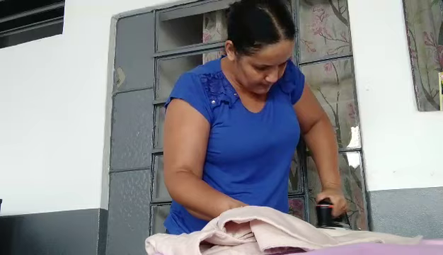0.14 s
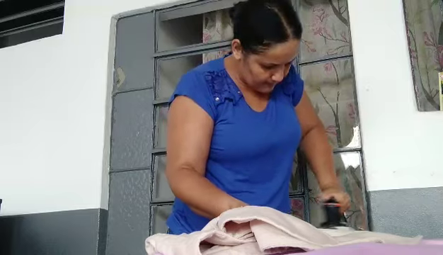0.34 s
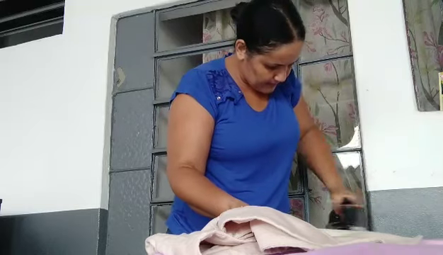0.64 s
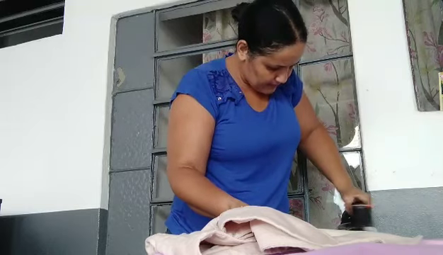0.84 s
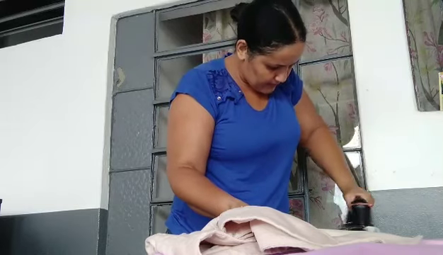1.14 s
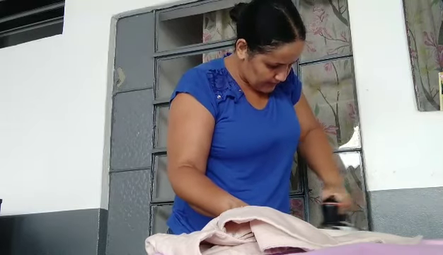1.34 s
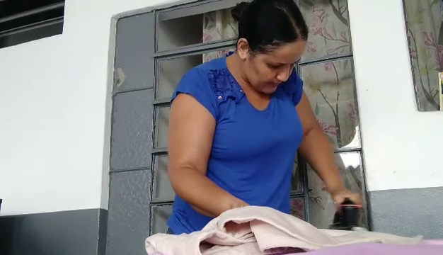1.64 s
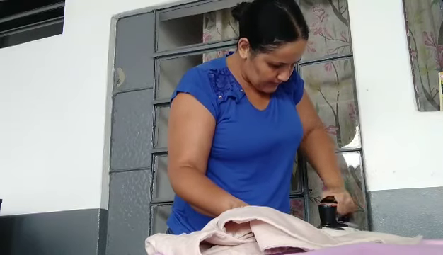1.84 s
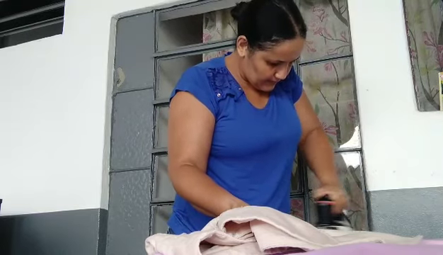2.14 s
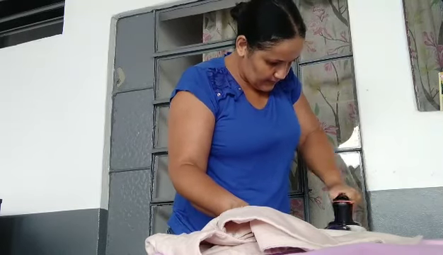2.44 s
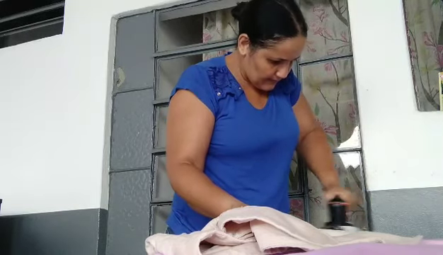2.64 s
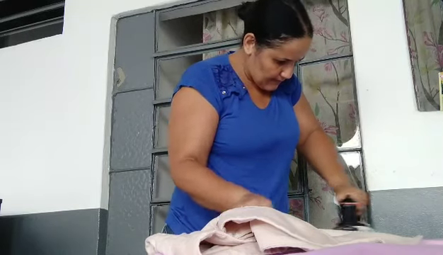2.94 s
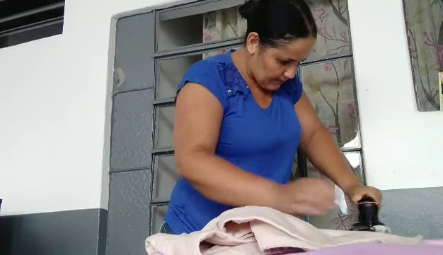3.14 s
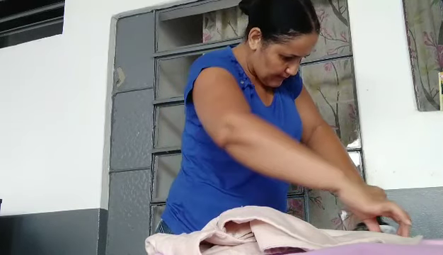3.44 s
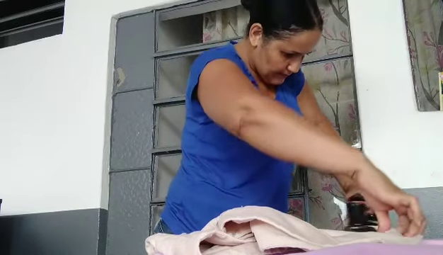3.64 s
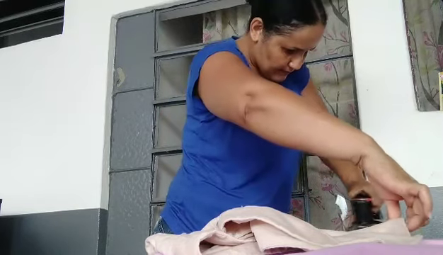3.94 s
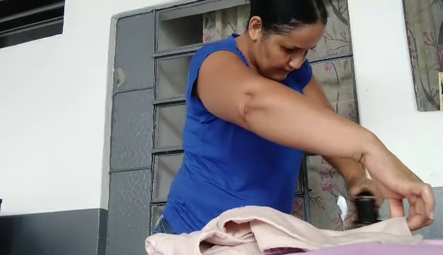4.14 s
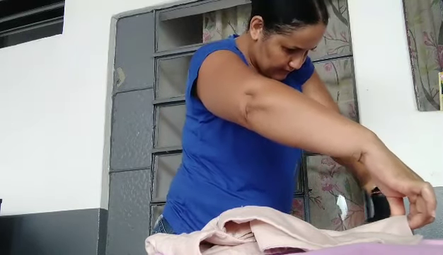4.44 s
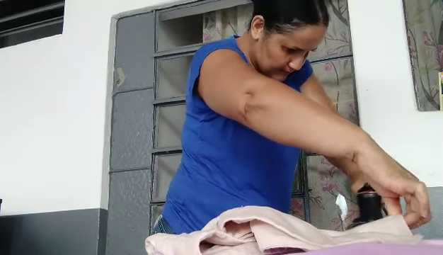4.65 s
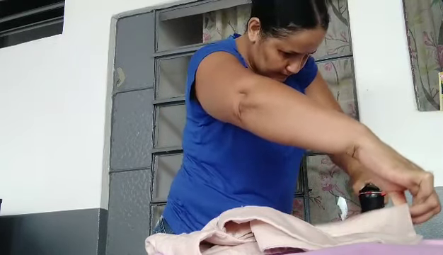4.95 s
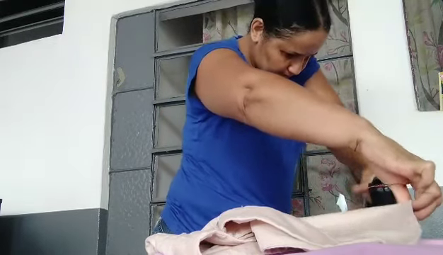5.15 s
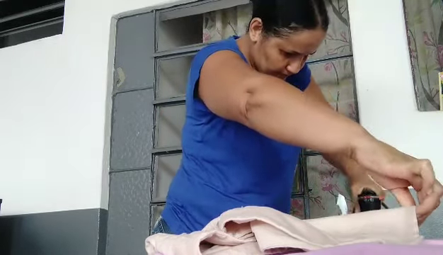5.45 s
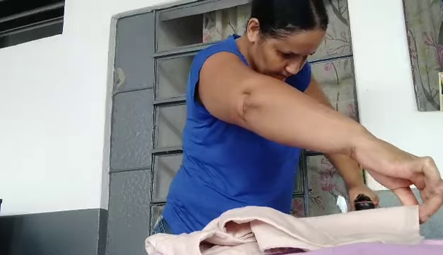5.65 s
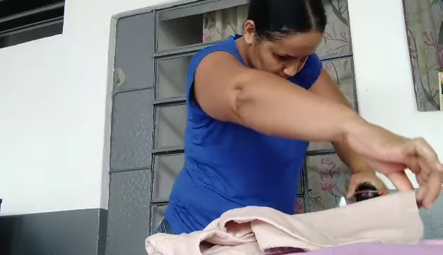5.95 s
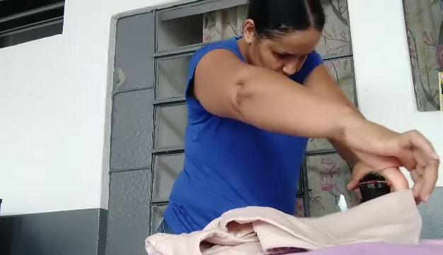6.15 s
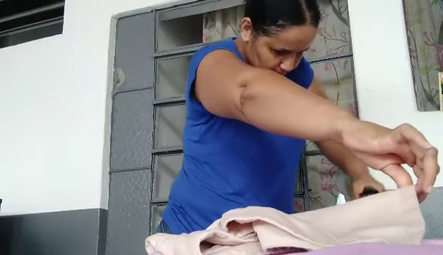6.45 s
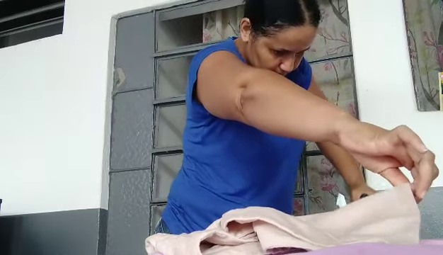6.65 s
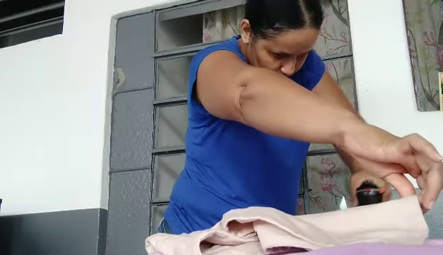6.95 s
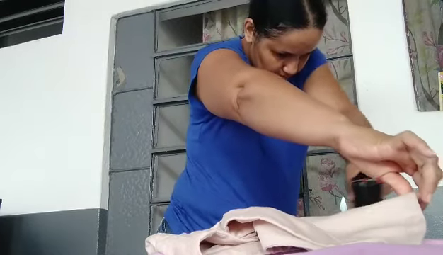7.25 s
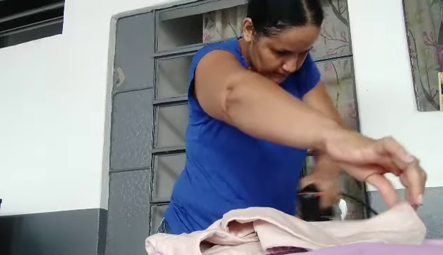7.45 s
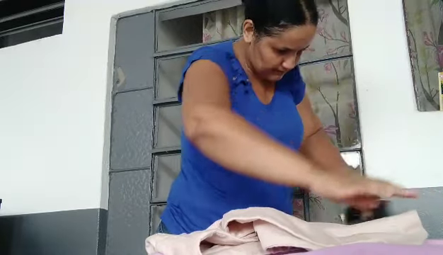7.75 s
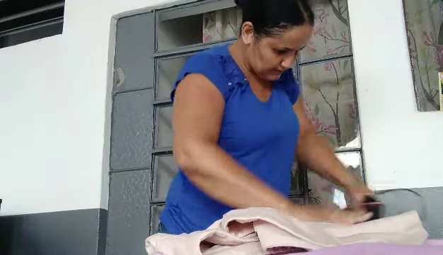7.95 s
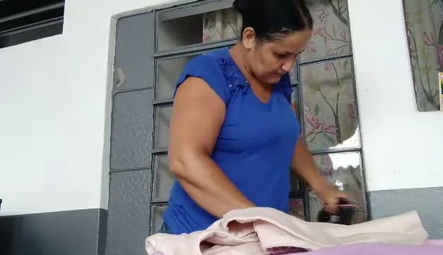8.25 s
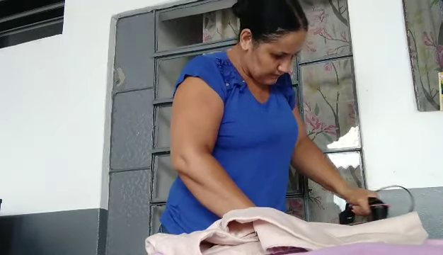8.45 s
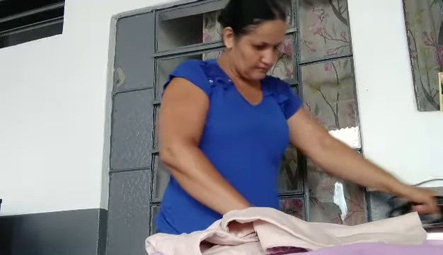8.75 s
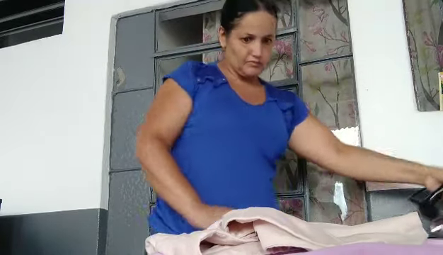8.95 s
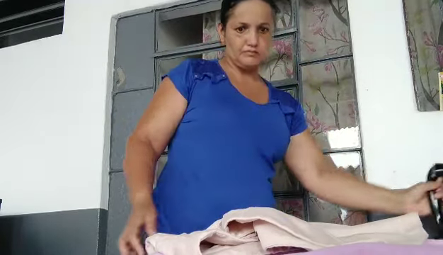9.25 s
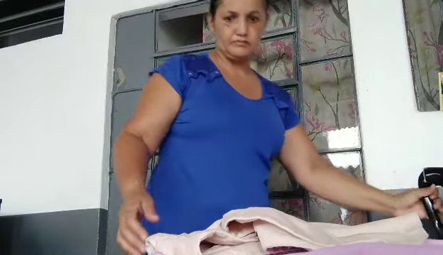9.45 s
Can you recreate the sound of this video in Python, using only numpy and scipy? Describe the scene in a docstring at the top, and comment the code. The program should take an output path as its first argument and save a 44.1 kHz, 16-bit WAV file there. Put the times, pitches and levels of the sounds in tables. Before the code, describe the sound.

A steam iron works near the microphone while muffled vehicles pass beyond the walls. Patchy soft rubbing mixes with plopping, ringing bubbles, tiny metallic ticks and sudden wet spits. The strongest knock is a low board bump before three seconds, followed by denser spitting around four. After a calmer stretch, steam blasts briefly with a high whistle, and a light heel thud ends the short-reverberant scene.

```python
"""Clothes are pressed with a steam iron on a padded board: noise bands and wavering tones make the traffic
beyond the walls and a steady hum throughout. From the start water simmers as ringing bubbles in the vents
and the soleplate rubs the cloth in noise; from 1 s drops spit, as bursts of coloured noise that die away.
The board is bumped at 2.8 s, in damped modes; at 8.3 s a jet of steam blows, noise with a whistle,
and at 9.3 s the iron is stood on its heel, with a thud and a ring."""
import sys
import numpy as np
from scipy import signal
from scipy.fft import rfft, irfft
from scipy.io import wavfile

SR = 44100
rng = np.random.default_rng(int(sys.argv[2]) if len(sys.argv) > 2 else 0)


def master_out(mix):
    """Clip the mix to full scale and print it as 16-bit PCM to the path in sys.argv[1]."""
    frames = np.transpose(np.atleast_2d(mix))
    ceiling = np.clip(frames, -1, 1)
    pcm = np.round(ceiling * 32767).astype(np.int16)
    wavfile.write(sys.argv[1], SR, pcm)


N = 423051
TIME, BINS = np.arange(N) / SR, np.fft.rfftfreq(N, 1 / SR)

# correlation of the two ears for the background: f/Hz, correlation
STREET_CORRELATION = [(30, .93), (75, 0.97), (140, 0.88), (280, 0.88), (500, 0.51), (800, 0.18),
                      (1300, -0.16), (2500, -0.064), (15000, -0.072)]
# correlation of the two ears for steam and cloth: f/Hz, correlation
STEAM_CORRELATION = [(200, 0.83), (400, 1), (700, 0.1), (1350, -.33), (2500, -0), (6000, 0)]


def amp(db):
    """Level to amplitude ratio: 20 dB is a factor of ten."""
    return 10 ** (np.asarray(db) / 20)


def unit(x):
    """Normalisation to a root-mean-square value of 1."""
    return x / np.sqrt(np.mean(x ** 2) + 1e-30)


def read(points, hz):
    """Linear interpolation of a table along a log-frequency axis."""
    f, value = np.transpose(points)
    return np.interp(np.log(hz + 1), np.log(f + 1), value)


def level(s, db):
    """An amplitude envelope linear in dB between points, silent outside them."""
    return amp(np.interp(TIME, s, db)) * (TIME >= s[0]) * (TIME <= s[-1])


def add(mix, s, sound):
    """Superposition: a sound is summed into the mix from a given moment."""
    part = mix[..., round(s * SR):][..., :sound.shape[-1]]
    part += sound[..., :part.shape[-1]]


def noise(gain, correlation):
    """Filtered noise of rms 1, its channels correlated by sharing part of one random spectrum."""
    first, other = rfft(rng.standard_normal((2, N)))
    shared = np.clip(read(correlation, BINS), -1, 1)
    second = shared * first + np.sqrt(1 - shared ** 2) * other
    return unit(irfft(np.array([first, second]) * gain, N))


def coloured(spectrum, correlation):
    """Noise whose spectral density follows a table in dB."""
    return noise(amp(read(spectrum, BINS)), correlation)


def drift(rate_hz):
    """A random modulation of rms 1: noise through a Gaussian low-pass."""
    lowpass = np.exp(-(BINS / rate_hz) ** 2)
    return unit(irfft(rfft(rng.standard_normal(N)) * lowpass, N))


def resonances(modes):
    """The summed gain of peaks, each at half its amplitude one width from its centre."""
    return sum(amp(db) / (1 + ((BINS - hz) / width) ** 2) for hz, width, db in modes)


def tone(hz, waver):
    """A sine of rms 1: phase is the integral of frequency, wandering by waver radians rms."""
    cycles = np.cumsum(hz * np.ones(N)) / SR + rng.random()
    return np.sqrt(2) * np.sin(2 * np.pi * cycles + waver * drift(9.2))


def fuzzy(phase, width_hz):
    """Narrow-band noise: a carrier modulated in quadrature by two random drifts, apart for each ear."""
    ears = [drift(width_hz) * np.cos(phase) + drift(width_hz) * np.sin(phase) for ear in range(2)]
    return unit(np.array(ears))


def swells(rows):
    """The power of bell-shaped swells, summed as for incoherent sources."""
    return sum(amp(db) ** 2 * np.exp(-((TIME - s) / half) ** 2) for s, half, db in rows)


def still_air():
    """Broadband noise of constant power stands for the still air."""
    # colour: f/Hz, relative density/dB
    air_colour = [(100, 0), (1500, -7), (2600, 4.5), (4000, 0), (5200, -3.5), (9000, -4.5), (11500, -7.5),
                  (15500, -8.5)]
    return amp(-88) * coloured(air_colour, STREET_CORRELATION)


def deep_rumble():
    """Low-frequency noise, its surges adding in power to a constant floor."""
    # colour: f/Hz, relative density/dB
    rumble_colour = [(5, -14), (18, 1.5), (27, 4.5), (35, 13), (46, -8), (60, -21.5), (150, -75)]
    # swells: middle t/s, half-length/s, relative peak level/dB
    surges = [(2.3, .4, -45.5), (3.57, .22, -42), (6.75, 0.063, -42), (9.3, .04, -50)]
    floor_db = -52
    envelope = np.sqrt(amp(floor_db) ** 2 + swells(surges))
    return envelope * coloured(rumble_colour, STREET_CORRELATION) * amp(1.2 * drift(6))


def traffic():
    """Street noise in bands: a drone, tyre rush tied to its level, and roars peaking as vehicles pass."""
    # loudness of the street: t/s, relative level/dB
    loudness = [(0, -51), (.3, -50), (.85, -45), (1.35, -46), (2, -46.5), (2.6, -49.5), (3, -45.5),
                (3.4, -49), (4.4, -51.5), (5.6, -48), (6.2, -45), (6.8, -43.5), (7.3, -46), (7.8, -44),
                (8.5, -48.5), (9.1, -51.5), (9.59, -52)]
    # colours of drone, rush and passing vehicle: f/Hz, relative density/dB
    drone_colour, rush_colour, roar_colour = [(35, -32.5), (55, 1), (72, 3), (95, 0), (125, -2),
                                              (160, -2.5), (190, -4), (230, -17.5), (320, -23), (700, -74)], [(100, -7.5), (200, 2), (260, 1.5), (340, -1),
                                                             (420, -4), (520, -6), (600, -8), (750, -13),
                                                             (1000, -21), (1400, -33.5), (2200, -42),
                                                             (4000, -48.5), (8000, -66.5)], [(70, -22), (120, -2), (190, 3),
                                                                           (270, 4), (400, 1), (520, -9),
                                                                           (620, -22), (1500, -59)]
    # vehicles going by: nearest t/s, relative peak level/dB, time to come/s, time to go/s
    vehicles = [(.75, -58.5, .3, .3), (6.75, -51, .55, .45), (7.8, -61, .3, .4)]
    rush_db, rush_follow, usual_db = -58.5, 0.4, -47  # rush follows the drone by a share of its dB

    street_db = np.interp(TIME, *np.transpose(loudness))
    drone = amp(street_db - 2.5) * coloured(drone_colour, STREET_CORRELATION)
    rush_gain = amp(rush_db + rush_follow * (street_db - usual_db))
    rush = rush_gain * coloured(rush_colour, STREET_CORRELATION)
    passing = 0
    for s, db, come, go in vehicles:
        passing = passing + amp(db) / (1 + ((TIME - s) / np.where(TIME < s, come, go)) ** 2)
    roar = passing * coloured(roar_colour, STREET_CORRELATION)
    return drone + (rush + roar) * amp(1.1 * drift(25))


def engine(rows, orders_db):
    """Harmonics of the firing rate, weighted by the frequency-dependent transmission of the walls."""
    # transmission of the walls: f/Hz, relative level/dB
    wall_gain = [(50, -15.5), (69, 0), (82, 0.5), (90, -9), (100, -4), (117, -2), (135, -5.5), (148, 0.5),
                 (166, -1), (180, -10), (230, -18)]
    s, hz, db = np.transpose(rows)
    firing = np.interp(TIME, s, hz)
    fade = np.clip(np.minimum(TIME - s[0], s[-1] - TIME) / 0.15, 0, 1)
    exhaust = 0
    for order, order_db in enumerate(orders_db, 2):
        gain = amp(order_db + read(wall_gain, order * firing) + 1.5 * drift(2.1))
        exhaust = exhaust + gain * tone(order * firing, .35)
    return fade * level(s, db) * exhaust


def street_engines():
    """Two harmonic sources in the street, each gliding with its own engine speed."""
    # courses: t/s, firing rate f/Hz, relative level/dB
    near_course, far_course = [(.3, 30.4, -59), (.7, 31.57, -49.5), (1.3, 33.09, -58.5),
                               (1.6, 33.35, -44.5), (2.1, 31.05, -49), (2.7, 28.79, -54), (3, 27.01, -48),
                               (3.6, 24.86, -54), (5, 26.87, -52.5), (5.7, 28.3, -55.5), (5.95, 29.5, -45),
                               (6.6, 33.13, -47), (7.1, 31.2, -51)], [(6.4, 33.36, -54.5), (6.7, 34.52, -45.5),
                                                    (7.2, 37.38, -50), (7.85, 39.56, -43),
                                                    (8.15, 36.88, -53), (8.6, 34.4, -47.5)]
    # strength of each order from the second up: relative level/dB
    near_orders, far_orders = [-13.5, -1.5, -1, -0.5, -8], [-10, 1.5, -10, -9.5]
    return engine(near_course, near_orders) + engine(far_course, far_orders)


def steady_hum():
    """Sustained sines of constant amplitude, their phases wandering slightly."""
    # f/Hz, rms level/dB
    hum_tones = [(78.1, -60.5), (119.8, -66.5), (156.1, -61.5), (312.2, -65)]
    return sum(amp(db) * tone(hz, 0.18) for hz, db in hum_tones)


def far_whine():
    """A narrow noise band with gliding centre frequency, faded in and out."""
    # start t/s, length/s, first f/Hz, last f/Hz, relative level/dB
    glides = [(0.411, 0.15, 930, 963, -74), (1.92, 0.27, 502, 481, -62), (2.568, .2, 650, 645, -66.5),
              (3, 0.95, 621.5, 575, -67.5), (4.249, .3, 635, 627, -67), (4.801, .75, 609.5, 565, -69),
              (5.64, 0.2, 635, 665, -63)]
    pitch, loudness = np.zeros((2, N))
    for s, length, first_hz, last_hz, db in glides:
        progress = np.linspace(0, 1, round(length * SR))
        add(pitch, s, first_hz + (last_hz - first_hz) * progress)
        add(loudness, s, amp(db) * np.sqrt(4 * progress * (1 - progress)))
    return loudness * fuzzy(2 * np.pi * np.cumsum(pitch) / SR, width_hz=13)


def rubbing():
    """Stick-slip friction: the soleplate catches and slides on the weave, so the noise is patchy."""
    # colour: f/Hz, relative density/dB
    cloth_colour = [(200, -8), (450, 0.5), (720, 2.5), (1000, -0.5), (1300, -8), (1900, -13.5),
                    (2700, -16.5), (3600, -21.5), (5000, -31.5), (9000, -36), (14000, -56.5)]
    # strokes over cloth: middle t/s, half-length/s, relative peak level/dB
    cloth_strokes = [(.05, .15, -71.5), (1.5, 0.53, -81), (5.7, 0.13, -81), (6.59, 0.033, -69),
                     (6.7, 0.034, -72.5), (6.88, 0.087, -69), (7.65, .25, -82.5), (8.9, .08, -77.5),
                     (9.35, .05, -75.5)]
    glide_db, lift_s = -83, 8.2  # the light rub between strokes, until the iron is lifted
    glide = amp(glide_db) * np.clip((lift_s - TIME) / 0.18, 0, 1)
    envelope = np.sqrt(glide ** 2 + swells(cloth_strokes))
    patches = amp(2.3 * drift(30) + 2.3 * drift(200))
    return envelope * coloured(cloth_colour, STEAM_CORRELATION) * patches


def board_knocks():
    """Impact excitation of damped modes over a deep thud; a soft contact spares the high modes."""
    # contacts: t/s, relative level/dB, thud relative level/dB, highest pitch excited f/Hz
    contacts = [(2.803, -40, -6, 527), (2.819, -42.5, 10, 430.7), (9.325, -57, 12, 900),
                (9.352, -58, 5, 900)]
    # modes of the padded board: f/Hz, relative level/dB, decay by 60 dB t60/s
    board_modes = [(186.5, 7.5, 0.074), (267, -2, 0.11), (378, -6, 0.14), (455, -1, 0.073), (525, 3, 0.079),
                   (674, 5, 0.059), (832, -15, 0.099), (1100, -12, .04)]
    out, t = np.zeros((2, N)), np.arange(SR // 3) / SR
    for s, db, thud_db, top_hz in contacts:
        ring = 0
        for hz, mode_db, t60 in board_modes:
            # phases of high modes differ more between the ears
            phase = rng.random() + hz / 2500 * rng.standard_normal((2, 1))
            decay = amp(mode_db - 60 * t / t60)
            ring = ring + decay * np.sin(2 * np.pi * (hz * t + phase)) / (1 + (hz / top_hz) ** 4)
        thud = amp(thud_db - 60 * t / 0.2) * np.sin(2 * np.pi * 88 * t)
        add(out, s, amp(db) * (ring + thud) * (1 - np.exp(-t / 0.0012)))
    return out


def heel_ring():
    """Free vibration: the iron's body rings in decaying sines as it is stood up."""
    # t/s, f/Hz, relative level/dB
    body_rings = [(9.324, 675, -56.5), (9.353, 652, -57)]
    out, t = np.zeros((2, N)), np.arange(SR // 3) / SR
    for s, hz, db in body_rings:
        add(out, s, amp(db - 60 * t / 0.17) * np.sin(2 * np.pi * hz * t) * (1 - np.exp(-t / 0.0035)))
    return out


def ticks():
    """Convolution of a brief noise scratch with the impulse response of one damped mode of hot metal."""
    # t/s, f/Hz, peak level/dB
    metal_ticks = [(1.088, 2500, -70), (1.298, 1880, -64.5), (1.645, 3200, -57), (5.764, 3000, -59),
                   (6.334, 2178, -64), (8.922, 2200, -67)]
    out, t = np.zeros((2, N)), np.arange(SR // 30) / SR
    for s, hz, db in metal_ticks:
        scratch = rng.standard_normal((2, len(t))) * np.exp(-t / 0.0033)
        mode = np.exp(-t / .0009) * np.sin(2 * np.pi * hz * t)
        ring = signal.fftconvolve(scratch, mode[None], axes=1)
        add(out, s, amp(db) * ring / abs(ring).max())
    return out


def bubble(db, high_db):
    """Resonance under impulses: a cluster of kicks rings the vents, with a faint fizz of noise."""
    # low modes (before detuning) and high modes of the vents: f/Hz, bandwidth/Hz, relative level/dB
    low_modes, high_modes = [(1169, 60, 13.5), (1274, 69, 4), (1354, 80, -2)], [(4430, 70, 0), (4720, 90, -14), (10850, 100, -13)]
    t = np.arange(SR // 16) / SR
    delays = np.append(0, 0.014 * rng.random(4))[:, None]
    age = np.maximum(t - delays, 0)
    kicks = np.exp(-delays / 0.025) * (1 - np.exp(-age / 0.0017))
    water = 1 + 0.08 * (rng.random() - .5)  # water in the vents detunes their low modes
    out = amp(-20 + high_db / 2) * np.exp(-t / .009) * rng.standard_normal(len(t))
    for modes, gain, pitch in ((low_modes, 1, water), (high_modes, amp(high_db - 8), 1)):
        ring = 0
        for hz, width, mode_db in modes:
            decay = np.exp(-np.pi * width * age)
            ring = ring + amp(mode_db) * kicks * decay * np.sin(2 * np.pi * hz * pitch * age)
        ring = ring.sum(0)
        out += gain * ring / abs(ring).max()
    return amp(db) * out


def sputters():
    """A random point process of bubbles at uneven gaps, each followed by a weaker, duller one."""
    # single large bubbles: t/s, relative level/dB, high ring relative level/dB
    large_bubbles = [(.0935, -56, -11.5), (.224, -58.5, -22), (1.3768, -52, -9.5), (2.498, -60.5, -32),
                     (2.648, -60, -35), (2.734, -61.5, -28), (3.0646, -59.5, -16), (3.151, -69, -33),
                     (3.496, -61, -26), (3.61, -62, -28), (3.768, -59, -28), (3.8127, -56, -36),
                     (3.9576, -65, -28), (5.007, -64.5, -30), (5.1063, -60, -35), (5.1784, -57.5, -35)]
    # bouts of simmering: start t/s, length/s, relative level of a typical bubble/dB
    bouts = [(0.018, .17, -62), (1.216, .38, -64.5), (2.467, .17, -68.5), (3.403, .19, -62.5),
             (4.409, .04, -65.5), (5.496, .05, -62.5), (5.871, .1, -69.5), (7.538, .11, -68.5)]
    gap_s, gap_spread = .036, .25  # median gap, and spread of its natural logarithm
    size_spread_db, simmer_high_db = 2.5, -33
    out, bubbles = np.zeros((2, N)), list(large_bubbles)
    for start, length, db in bouts:
        gap, size = rng.standard_normal((2, 24))
        gaps = gap_s * np.exp(gap_spread * gap)
        ages = np.cumsum(gaps) - gaps[0]
        for age, z in zip(ages, size):
            if age < length:
                bubbles.append((start + age, db + size_spread_db * z, simmer_high_db))
    for s, db, high_db in bubbles:
        lag = rng.uniform(.018, .05)
        for ear in out:
            add(ear, s, bubble(db, high_db))
            add(ear, s + lag, bubble(db - 19, high_db - 11.5))
    return out


def spits():
    """Flash boiling: a drop bursts with a pop and sizzles away, while hiss swells until the water is gone."""
    # drops: t/s, length/s, then relative level/dB of the low puff, the sizzle and the hiss
    drops = [(1.004, 0.022, -52.5, -74, -93), (1.031, 0.066, -61.5, -77.5, -95),
             (1.635, 0.015, -64, -71, -83), (2.855, 0.015, -57, -72, -84), (3.301, 0.039, -52, -63, -69.5),
             (3.722, 0.048, -50.5, -64, -70.5), (3.968, 0.0091, -66, -78, -95),
             (4.031, 0.071, -50, -61, -65), (4.26, 0.033, -66.5, -91, -98),
             (5.325, 0.029, -54.5, -66.5, -75), (5.761, 0.025, -62.5, -63, -71),
             (6.147, 0.014, -56, -68, -84), (6.174, .028, -66.5, -81.5, -99),
             (7.023, 0.081, -52.5, -61.5, -67), (7.399, 0.023, -59.5, -70.5, -75.5),
             (7.816, 0.065, -62.5, -82, -85.5), (8.924, 0.0086, -84, -91, -79.5)]
    # colours: f/Hz, relative density/dB
    pop_colour, puff_colour = [(400, -12.5), (650, 8), (1150, 7), (1500, -7.5), (2200, -5.5), (3300, -17.5),
                               (4100, -16.5), (4700, -28), (9500, -34), (12000, -43)], [(150, -37), (330, -14.5), (500, -8.5), (620, 4), (860, -3),
                                            (950, -14.5), (1030, -2.5), (1200, -10.5), (1350, -7.5),
                                            (1520, -18.5), (2500, -35.5), (6000, -68)]
    sizzle_colour, hiss_colour = [(700, -17.5), (1450, -22), (1900, 5.5), (2700, -3), (3400, -10.5),
                                  (4200, -12), (5200, -29), (9000, -29.5), (15000, -49.5)], [(1200, -34), (3000, 2.5), (4400, -3.5), (5500, -6),
                                                  (7000, -10), (9200, -8.5), (10800, -21), (12500, -33),
                                                  (15500, -33)]
    pop_db, pop_peak_s = 0.5, 0.0042  # level against the tabled puff, and time to its top
    pop, puff, sizzle, hiss = np.zeros((4, N))
    t = np.arange(SR // 4) / SR
    for s, length, puff_db, sizzle_db, hiss_db in drops:
        progress = np.minimum(t / length, 1)
        onset, after = 1 - np.exp(-t / 0.00068), np.maximum(t - length, 0)
        add(pop, s, amp(puff_db + pop_db) * t / pop_peak_s * np.exp(1 - t / pop_peak_s))
        add(puff, s, onset * amp(puff_db - 2.0 - 6 * progress) * np.exp(-after / 0.025))
        add(sizzle, s, onset * amp(sizzle_db - .5 - 6.4 * progress) * np.exp(-after / .0072))
        add(hiss, s, onset * amp(hiss_db - 9 * (1 - progress) ** 2) * np.exp(-after / .002))
    steam = pop * coloured(pop_colour, STEAM_CORRELATION)
    steam += puff * coloured(puff_colour, STEAM_CORRELATION)
    steam += sizzle * coloured(sizzle_colour, STEAM_CORRELATION)
    steam += hiss * coloured(hiss_colour, STEAM_CORRELATION)
    return steam * amp(2.1 * drift(250))


def jet():
    """Jet noise and vent resonance, with a whistle whose pure core sags as the pressure runs out."""
    # colour of the blast: f/Hz, relative density/dB
    blast_colour = [(300, -20), (600, 16.5), (850, -1), (1100, 9), (1550, 2), (1900, -0.5), (2600, -1.5),
                    (3700, -3.5), (4800, -7), (5800, -8), (7500, -4), (9300, -5.5), (11500, -20),
                    (15500, -25)]
    # vent modes: f/Hz, half-width at half amplitude/Hz, relative level/dB
    blast_modes = [(2620, 60, -9), (2980, 110, -8), (4040, 56, -4), (4440, 55, 2), (4830, 150, -5),
                   (6000, 70, -7), (6280, 65, -7), (6790, 60, -6), (7120, 50, -2), (8550, 92, 3.5),
                   (9210, 35, -9)]
    start_s, length_s, rise_s, stop_s = 8.307, .131, .016, .004  # pressure builds, bleeds, collapses
    blast_db, fade_db_per_s = -56, -88  # relative level and its slope
    whistle_hz, whistle_db, whistle_rise_s = 1542, -58.5, 0.0034  # final pitch before any sag
    scoop_hz, scoop_s = 303, 0.0091  # the whistle starts this far flat
    sag_after_s, sag_hz_per_s, sag_db = .09, 13300, 5  # and its core falls, a little louder

    age = np.clip(TIME - start_s, 0, 2 * length_s)
    flow = np.exp(-np.maximum(age - length_s, 0) / stop_s)
    turbulence = amp(3.5) * coloured(blast_colour, STEAM_CORRELATION)
    ringing = amp(-1.5) * noise(resonances(blast_modes), STEAM_CORRELATION)
    pressure_db = blast_db + fade_db_per_s * np.maximum(age - rise_s, 0)
    blast = (turbulence + ringing) * np.minimum(age / rise_s, 1) * amp(pressure_db + .89 * drift(150))

    vent_hz = whistle_hz - scoop_hz * np.exp(-age / scoop_s)
    phase = 2 * np.pi * np.cumsum(vent_hz) / SR
    sag = np.maximum(age - sag_after_s, 0)
    core = np.array([tone(vent_hz - sag_hz_per_s * sag, 0.5) for ear in range(2)])
    core *= amp(sag_db * np.minimum(sag / .01, 1))
    whistle = amp(-5 + 2.5 * drift(90)) * core
    whistle += amp(-1.5) * fuzzy(phase, width_hz=78)
    whistle += amp(-6.5) * fuzzy(.69 * phase, width_hz=84)  # weaker lower partner
    return flow * (blast + amp(whistle_db) * np.minimum(age / whistle_rise_s, 1) * whistle)


def reflected(x):
    """Comb filtering: early echoes from board, wall and door ripple the spectrum apart at each ear."""
    # one row an ear, one column a reflection: delay/s
    echo_delays = [(.0023, .0041, .0058, 0.012), (0.00121, 0.0041, .0062, 0.0082)]
    # strength of each reflection in turn: relative level/dB
    echo_levels = [-12.5, -15, -11.5, -14.5]
    out = x.copy()
    for ear, sound, delays in zip(out, x, echo_delays):
        for s, db in zip(delays, echo_levels):
            add(ear, s, amp(db) * sound)
    return out


def room(x):
    """Diffuse reverberation: convolution with noise that decays exponentially, band by band."""
    # f/Hz, decay by 60 dB t60/s
    decay_times = [(100, 0.25), (700, 0.47), (2500, 0.3), (6000, 0.15), (14000, 0.11)]
    hz, t, z = signal.stft(rng.standard_normal((2, SR // 2)), SR, nperseg=256)
    decay = amp(-60 * t / read(decay_times, hz)[:, None])
    build_up = 1 - np.exp(-t / 0.013)
    tail = signal.istft(z * decay * build_up, SR, nperseg=256)[1]
    return signal.fftconvolve(x, tail / np.linalg.norm(tail[0]), axes=1)[:, :N]


def scene():
    """Superposition of the street, the direct and reflected iron, and its reverberation."""
    street = still_air() + deep_rumble() + traffic() + street_engines() + steady_hum() + far_whine()
    iron = rubbing() + board_knocks() + heel_ring() + ticks() + sputters()
    iron += amp(-1) * reflected(spits())
    blast = amp(-1) * reflected(jet())
    return iron + blast + room(amp(-18.5) * iron + amp(-28) * blast) + street


def record(dry):
    """Interaural level difference by frequency, then a linear-phase low-pass as the band limit."""
    # left minus right: f/Hz, level difference/dB
    left_lean = [(30, 2), (130, .8), (300, 1.5), (650, 2), (1300, 2.5), (2500, 1.5), (4400, 1), (8000, 1),
                 (15000, -.5)]
    edge_hz = 15500
    ends = signal.windows.tukey(N, .001)  # short fades at both ends
    lean = amp(np.array([[.5], [-.5]]) * read(left_lean, BINS))
    heard = irfft(rfft(dry * ends) * lean, N)
    lowpass = signal.firwin(511, edge_hz, window=("kaiser", 9), fs=SR)
    return signal.oaconvolve(heard, lowpass[None], "same")


dry = scene()
out = record(dry)
master_out(out)
```